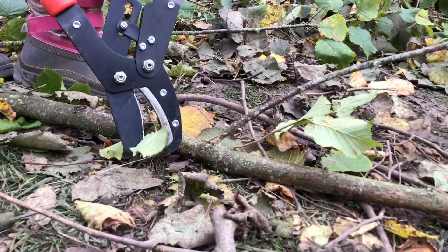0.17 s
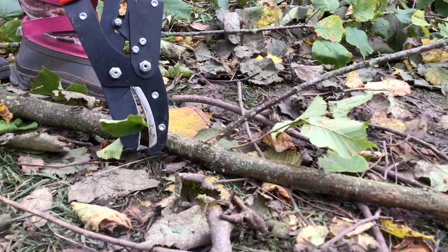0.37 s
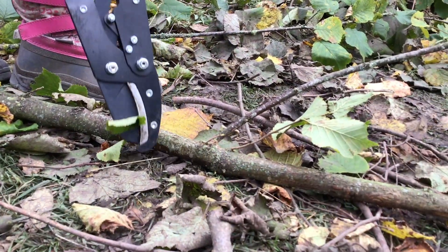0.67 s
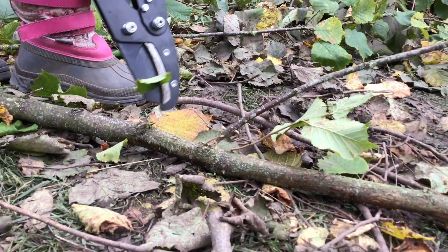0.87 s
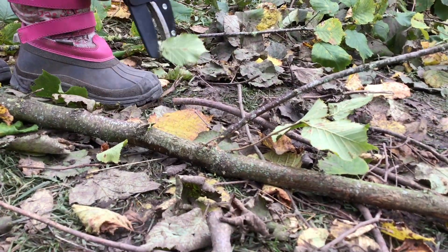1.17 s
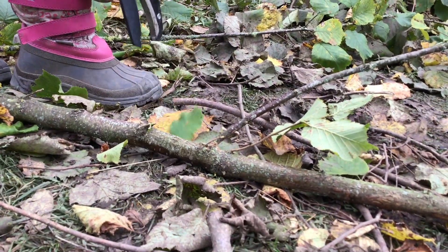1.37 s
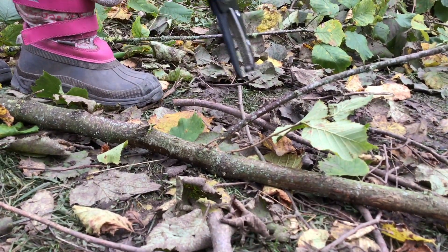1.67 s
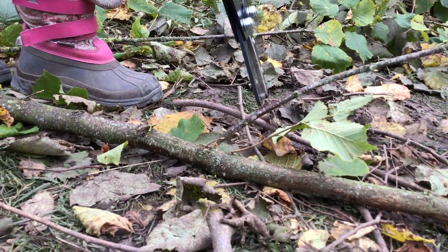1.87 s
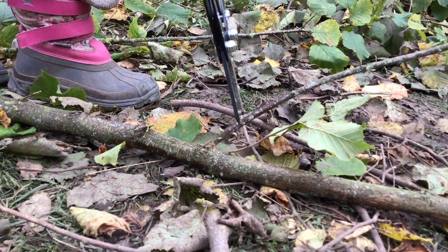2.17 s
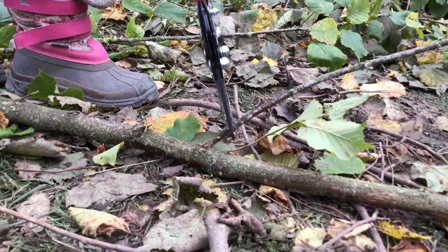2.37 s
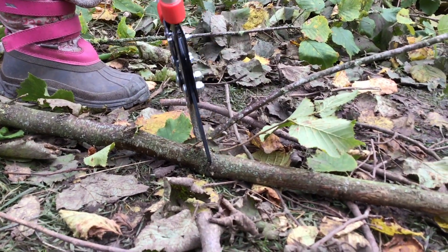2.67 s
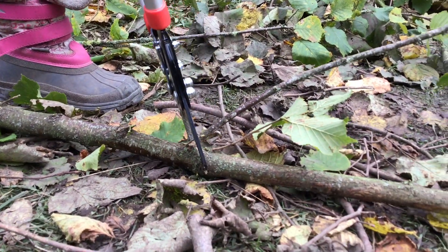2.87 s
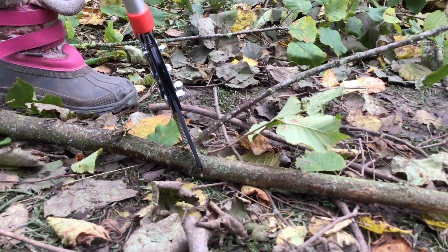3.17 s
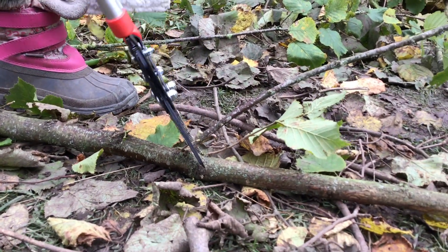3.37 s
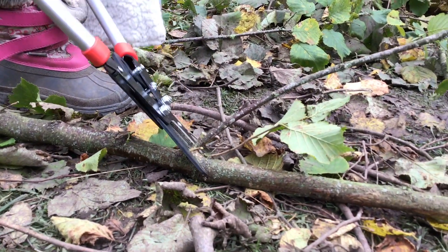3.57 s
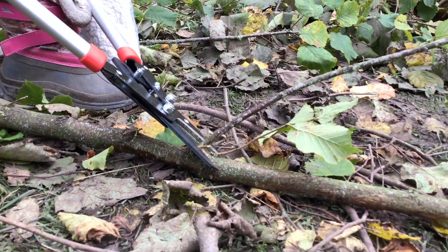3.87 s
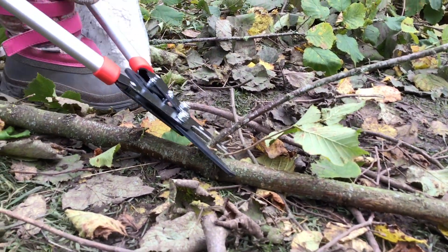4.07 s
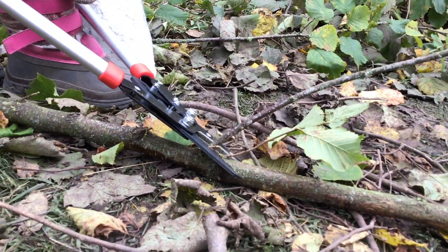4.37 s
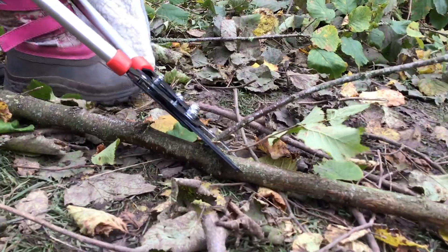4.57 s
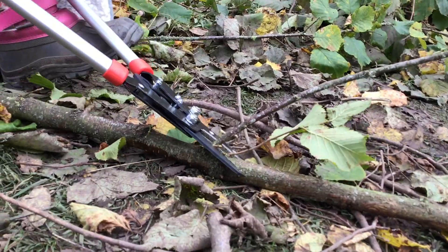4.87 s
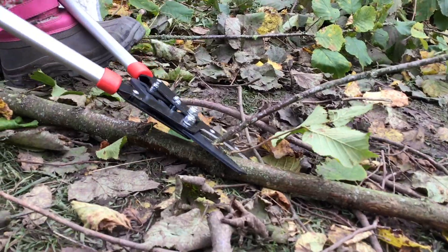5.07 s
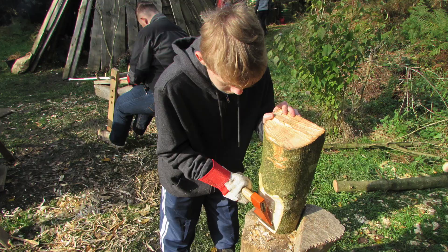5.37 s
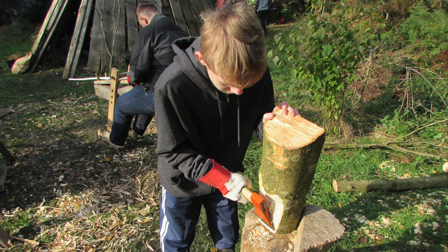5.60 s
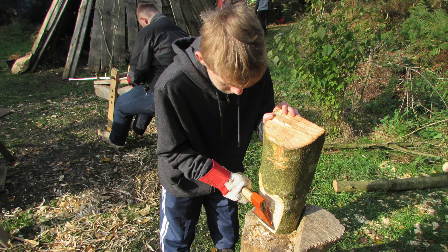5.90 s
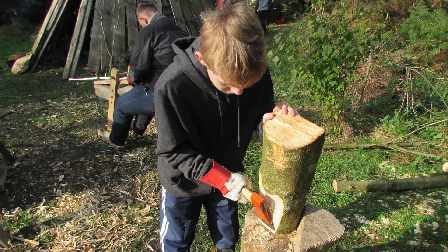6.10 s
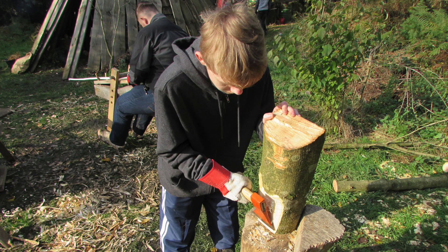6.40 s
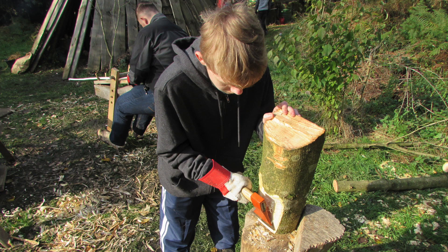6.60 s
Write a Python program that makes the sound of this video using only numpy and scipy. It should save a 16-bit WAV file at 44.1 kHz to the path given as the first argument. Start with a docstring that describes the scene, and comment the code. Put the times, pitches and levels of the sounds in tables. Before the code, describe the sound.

Close to a small microphone outdoors, steel lopper jaws click lightly, then snap shut very loudly near one second, leaving a brief high blade ring and a fainter hollow handle ring. A quieter middle has leaf rustle, scattered clicks, faint metal rubbing and two distant thin bird whistles. A second hard snap comes late, followed by busier clicks and soft knocks. Low wind rumbles throughout.

```python
"""Long-handled loppers work on thin branches on a woodland floor, close to a small microphone.
Light clicks come first; near one second the steel jaws snap shut, and blade and hollow handles ring on.
In the quieter middle a far bird whistles twice. Near 5.4 seconds the jaws snap shut again and more clicks follow.
All along, steel rubs now and then, leaves and twigs rustle, and a light wind pushes on the microphone.
The metal is made of short noise and dying tones, the litter and wind of shaped noise, the bird of gliding tones."""
import sys
import numpy as np
from scipy import signal
from scipy.fft import rfft, irfft, next_fast_len
from scipy.io import wavfile
from scipy.ndimage import map_coordinates

SR = 44100
rng = np.random.default_rng(int(sys.argv[2]) if len(sys.argv) > 2 else 0)


def magnitude_from_level(level_db):
    """Linear magnitude for a level in decibels (20 dB per decade)."""
    exponent = np.asarray(level_db, float) / 20
    return 10 ** exponent


def master_out(mix):
    """Clip the mix to full scale and print it as 16-bit PCM to the path in sys.argv[1]."""
    frames = np.transpose(np.atleast_2d(mix))
    ceiling = np.clip(frames, -1, 1)
    pcm = np.round(ceiling * 32767).astype(np.int16)
    wavfile.write(sys.argv[1], SR, pcm)


N = 297234  # length in samples


def unit(x):
    """Scaled to rms 1."""
    return x / np.sqrt(np.mean(x ** 2) + 1e-20)


def along(points, hz):
    """Reads a curve of (Hz, value) points, joined by straight lines on a log frequency axis."""
    point_hz, value = np.transpose(points)
    return np.interp(np.log(hz + .1), np.log(point_hz + .1), value)


def wobble(rate):
    """A smooth random curve with rate random points a second."""
    return map_coordinates(rng.standard_normal(N // 100), [np.arange(N) * rate / SR])


def coloured(x, spectrum):
    """Filters x by a curve of (Hz, dB) points."""
    m = next_fast_len(len(x) + 8192)
    gain = magnitude_from_level(along(spectrum, np.fft.rfftfreq(m, 1 / SR)))
    return irfft(rfft(x, m) * gain, m)[:len(x)]


def add(track, s, sound):
    """Mixes a sound into the track at s seconds."""
    part = track[round(s * SR):][:len(sound)]
    part += sound[:len(part)]


def ring(modes, t, spread_db, sag=0):
    """Dying tones of slightly random strength; a tight part starts sharp by the share sag and settles."""
    bent = t + sag * .1 * (1 - np.exp(-t / .1))  # the pitch settles with a time constant of 0.1 s
    total = 0
    for hz, db, t60 in modes:
        level_db = db + rng.normal(0, spread_db) - 60 * t / t60
        total = total + magnitude_from_level(level_db) * np.sin(2 * np.pi * hz * bent)
    return total


def clicks():
    """Each contact is a short rattle of noise through the damped jaw tones; a dull one trades treble for lows."""
    # Contacts of the jaws. Each row: start in seconds, energy in dB, dullness in dB (extra lows),
    # ring of the pivot in dB over the energy.
    contacts = [(.054, -39, 1, 7), (.236, -36.5, 0.5, 1), (.314, -39, 9, 14), (.456, -39.5, 9, 12),
                (0.5373, -17, 2.5, 21), (0.5447, -14, 6.5, 16), (.553, -19.5, -2, -3),
                (.865, -28.5, 11, 20.5), (.936, -30.5, 8.5, 4.5), (.943, -26.5, -2.5, -5.5),
                (.969, -25.5, 5, 12), (0.9719, 12.5, -3, 9), (0.9745, 8.5, -2, 7),
                (1.036, -27.5, -0.5, 22.5), (1.168, -50.5, 13, 10.5), (1.185, -49.5, 13, 14.5),
                (1.229, -49.5, 14, 25.5), (1.3357, -26.5, 3.5, 6.5), (1.431, -43.5, 11.5, 11),
                (1.991, -52, 14, 10), (2.471, -26, 8, 7.5), (2.571, -40, 1, 10), (2.629, -33.5, 6, 15.5),
                (2.64, -27.5, 1.5, 3), (2.662, -33.5, 11.5, 9), (2.781, -36, 6, 1), (3.521, -42.5, 10, 13),
                (4.052, -41.5, 12.5, 1), (4.3997, -25, 8, 8), (4.4035, -19.5, 1, 10),
                (4.4348, -28, 16.5, -0.5), (4.436, -29.5, 13, -1.5), (4.444, -35.5, 13.5, 4.5),
                (4.9234, -49, 20, 12), (5.048, -44, 8.5, 8), (5.202, -35, 3, 7.5), (5.387, -8.5, -8, 6.5),
                (5.3882, 11, -3.5, 1), (5.392, 2.5, 2.5, -1.5), (5.409, -17, -4.5, -0.5),
                (5.492, -30.5, -7, 11), (5.51, -28, 0.5, -12.5), (5.528, -32, -4, -13),
                (5.5682, -25.5, 1, 4), (5.7662, -26, 3, 4.5), (5.812, -26, -1, 1), (5.826, -30, -3, 12),
                (5.834, -37, 2, 3), (5.9948, -19.5, 14, 12.5), (6.007, -34.5, 15.5, 5),
                (6.0174, -21, -5, -5), (6.028, -32, 2, 14.5), (6.2733, -27.5, 6, 3), (6.347, -12, 6, 7.5)]
    # Tones of the jaws. Each row: pitch in Hz, level in dB, time to fall by 60 dB in seconds.
    jaw_tones = [(1100, -7.5, 0.025), (1705, -0.5, 0.0096), (2046, -1.5, 0.016), (2632, -0.5, 0.0099),
                 (3377, -2, 0.019), (3650, 7, 0.0065), (4670, -3.5, 0.0053), (5670, -5, 0.0033),
                 (7210, -4.5, 0.0027), (8240, -2.5, 0.0034), (9310, -1.5, 0.0045), (11050, -7, 0.002),
                 (11650, -4.5, .007), (12820, 1, 0.0057), (13670, 2.5, 0.0082), (16600, -2.5, 0.0079)]
    # Low, pivot, middle and top band of a contact. Each row: lower and upper edge in Hz.
    bands = [(1000, 2300), (3000, 4000), (5000, 9500), (10500, 15000)]
    rattle_s, rattle_t60 = .0019, 0.0063  # the force holds, then dies
    edge_db, dull_costs = -7, 0.28  # top band of a light neutral contact; dB it loses per dB of dullness
    hard_from_db, hard_gains = -18, .4  # above this energy the top band gains so many extra dB per dB

    out, t = np.zeros(N), np.arange(SR // 16) / SR
    hz = np.fft.rfftfreq(len(t), 1 / SR)
    for s, energy_db, dull_db, pivot_db in contacts:
        force = rng.standard_normal(len(t)) * magnitude_from_level(-60 * np.maximum(t - rattle_s, 0) / rattle_t60)
        body = ring(jaw_tones, t, spread_db=1.5)
        body[0] = 8  # the bare crack
        hit = signal.fftconvolve(force, body)[:len(t)]

        # Filter the hit so that each band has its wanted strength.
        power = np.abs(rfft(hit)) ** 2
        top_db = edge_db - dull_costs * dull_db + hard_gains * max(energy_db - hard_from_db, 0)
        band_db = energy_db + np.array([dull_db, pivot_db, 0, top_db])
        gain, colour = [], []
        for db, (lo, hi) in zip(band_db, bands):
            gain.append(db - 10 * np.log10(power[(hz > lo) & (hz < hi)].mean()))
            colour += [(lo, gain[-1]), (hi, gain[-1])]
        bass = [(200, gain[0] - 28), (750, gain[0] - 14)]  # small parts radiate no bass
        treble = [(16300, gain[-1] - 2), (16900, gain[-1] - 35)]
        add(out, s, coloured(hit, bass + colour + treble))
    return out


def blade():
    """A few hard contacts leave the thin blade ringing high until it touches wood again."""
    # Tones of the blade. Each row: pitch in Hz, level in dB, time to fall by 60 dB in seconds.
    blade_tones = [(8495, 1.5, 0.07), (12100, -16.5, 0.036), (12500, -12, .035)]
    # Rings of the blade. Each row: start in seconds, level in dB, time it rings freely in seconds.
    blade_rings = [(0.5425, -46.5, 0.019), (0.9735, -11.5, 0.074), (4.4019, -51, .014),
                   (5.3916, -21, 0.011), (6.345, -50, 0.013)]
    out, t = np.zeros(N), np.arange(SR // 8) / SR
    for s, db, free in blade_rings:
        touch = magnitude_from_level(-3000 * np.maximum(t - free, 0))  # the wood damps it by 3000 dB per second
        onset = 1 - np.exp(-t / 0.00051)
        add(out, s, magnitude_from_level(db) * ring(blade_tones, t, spread_db=1.0) * touch * onset)
    return out


def handles():
    """The tubes and the linkage ring until a firmer grip stops them; once a stretched part glides down."""
    # Jolts that set the handles ringing. Each row: start in seconds, tube level in dB, hardness in dB
    # (added from tone to tone), linkage level in dB, time they ring freely in seconds.
    jolts = [(.976, -57, 2, -63, .06), (1.034, -58.5, 0, -80, .11), (5.391, -62, -9, -53, .2),
             (5.49, -70, 14, -60, .2), (6.13, -81, -11, -86, .17), (6.348, -69, 6, -64, .4)]
    # Handle tubes, linkage and stretched part (pitch at rest).
    # Each row: pitch in Hz, level in dB, time to fall by 60 dB in seconds.
    tube_tones = [(547, -3, 1.1), (1096, 2, 1.5), (1643, -1, .6)]
    link_tones = [(720, -12, 0.67), (2330, -10.5, 0.52), (2476.4, -7.5, 0.19), (2750, -12, 0.28),
                  (3230, -7, 0.29), (3390, 0.5, 0.33), (3930, -3.5, 0.28), (4550, -8, 0.33),
                  (5560, -18, .3)]
    spring_tones = [(3340, -53, .7), (3970, -55, .8), (6450, -68, .4)]
    release_s, sharp_share = .975, .06  # the stretched part lets go; share by which it starts sharp
    grip_db_per_s = -300

    out, t = np.zeros(N), np.arange(SR * 3 // 4) / SR
    for s, tube_db, hard_db, links_db, free in jolts:
        struck = []
        for k, (hz, db, t60) in enumerate(tube_tones):
            struck.append((hz, tube_db + db + hard_db * (k - 1), t60))
        tube = ring(struck, t, spread_db=3)
        linkage = magnitude_from_level(links_db) * ring(link_tones, t, spread_db=1.5)
        grip = magnitude_from_level(grip_db_per_s * np.maximum(t - free, 0))
        onset = 1 - np.exp(-t / 0.0027)
        add(out, s, (tube + linkage) * grip * onset)
    spring = ring(spring_tones, t, spread_db=0.5, sag=sharp_share)
    add(out, release_s, spring * magnitude_from_level(grip_db_per_s * np.maximum(t - .3, 0)))
    return out


def rubs():
    """Steel slides on steel: a swell of noise in one resonance of the jaws, which do not close."""
    # Each row: start in seconds, length in seconds, level in dB, resonance in Hz.
    slides = [(.4, .13, -76, 3460), (0.687, 0.051, -68.5, 8340), (2.031, .06, -76, 7580),
              (2.35, .07, -81, 3300), (2.551, 0.13, -65, 3330), (2.592, 0.064, -67, 8260),
              (2.889, .06, -75.5, 3350), (5.41, 0.051, -58, 3530)]
    rub_width = 0.079  # bandwidth as a share of the pitch
    out = np.zeros(N)
    for s, length, db, hz in slides:
        n = round(length * SR)
        resonance = signal.iirpeak(hz, 1 / rub_width, SR)
        noise = unit(signal.lfilter(*resonance, rng.standard_normal(n)))
        add(out, s, magnitude_from_level(db) * np.sqrt(np.hanning(n)) * noise)
    return out


def thuds():
    """Wood on the ground knocks softly and low: a damped tone and its overtone."""
    # Each row: start in seconds, level in dB, pitch in Hz, time to fall by 60 dB in seconds.
    knocks = [(.54, -47, 600, .02), (.866, -56, 620, 0.026), (.972, -36, 420, .015),
              (0.969, -32, 194, 0.019), (4.157, -58, 200, 0.031), (4.735, -61, 431, .12),
              (4.762, -59, 221, .024), (4.922, -45, 245, .018), (5.048, -51.5, 580, 0.017),
              (5.2, -45, 276, 0.024), (5.388, -34.5, 240, .03), (5.39, -33, 450, 0.02034),
              (5.483, -56.5, 258, .074), (5.547, -56, 190, 0.058), (5.753, -49.5, 349, 0.039),
              (5.813, -58, 241, .11), (5.86, -50.5, 322, .023), (5.992, -49, 280, 0.035),
              (6.68, -60, 295, 0.032)]
    out, t = np.zeros(N), np.arange(SR // 6) / SR
    for s, db, hz, t60 in knocks:
        tones = [(hz, 0, t60), (2.1 * hz, -8, .7 * t60)]
        add(out, s, magnitude_from_level(db) * ring(tones, t, spread_db=1.5))
    return out


def trees(x):
    """Ground and trunks scatter a short answer: noise whose treble dies faster, a few milliseconds late."""
    # Each row: frequency in Hz, time to fall by 60 dB in seconds.
    scatter_decay = [(300, 0.22), (3000, 0.12), (12000, 0.044)]
    hz, t, z = signal.stft(rng.standard_normal(SR // 3), SR, nperseg=256)
    decay = magnitude_from_level(-60 * t / along(scatter_decay, hz)[:, None])
    tail = signal.istft(z * decay, SR, nperseg=256)[1]
    late = np.pad(x, (200, 0))  # delay in samples
    return signal.fftconvolve(late, tail / np.linalg.norm(tail))[:N]


def stirring():
    """Gains of leaves, fizz and twigs as tool and boots stir the litter: fast rise, swell or sag, then a fall."""
    # Each row: start in seconds, length in seconds, level in dB, swell in dB over its length,
    # fizz of dry edges in dB over the leaves.
    stirs = [(0.132, 0.13, -70, -8.5, -10), (.26, 0.33, -67, -4, -8.5), (0.678, .06, -72.5, 0.5, -5),
             (0.77, 0.2, -71, -4.5, -11), (0.981, 0.068, -52.5, -2, -3.5), (1.069, 0.256, -67.5, -4.5, -4),
             (1.335, 0.043, -64.5, -2, -8), (2.02, 0.065, -74, 1, -12), (2.356, .05, -75, -3, -8),
             (2.506, 0.15, -71, 10.5, -12), (2.717, 0.088, -74.5, 11, -10.5),
             (2.827, .12, -72.5, 2.5, -11.5), (2.972, .2, -79.5, 0.5, -10), (3.199, 0.18, -74, 1, -12.5),
             (3.453, 0.16, -70.5, 2.5, -7.5), (3.62, 0.34, -72.5, 0, -10.5), (3.961, 0.25, -69, 2.5, -9),
             (4.22, 0.19, -72.5, -1.5, -10), (4.439, 0.039, -59, -4, -10), (4.399, 0.052, -62, 1, -11),
             (4.504, 0.13, -69.5, 3.5, -11.5), (4.658, 0.486, -69.5, -3.5, -12),
             (5.166, 0.18, -66, -2.5, -9.5), (5.388, 0.089, -56, -6, -5), (5.487, 0.19, -62, -0.5, -8),
             (5.686, 0.15, -61.5, 3.5, -10), (5.86, 0.054, -65, -3.5, -11.5), (5.929, 0.061, -67, 14, -14),
             (6.001, 0.069, -52.5, -7, -13.5), (6.091, .09, -68.5, 0, -9.5), (6.234, 0.056, -73, 2, -11),
             (6.529, 0.19, -73.5, 0.5, -11)]
    still_db = np.array((-77, -88.5, -77.5))  # leaves, fizz and twigs at rest
    twigs_db = -8.5  # twigs against the stirred leaves
    rise_db_per_s, fall_db_per_s = 900, 500
    t = np.arange(N) / SR
    power = magnitude_from_level(still_db)[:, None] ** 2 * np.ones(N)
    for s, length, db, swell_db, fizz_db in stirs:
        swell = swell_db * np.clip((t - s) / length, 0, 1)
        rise = rise_db_per_s * np.maximum(s - t, 0)
        fall = fall_db_per_s * np.maximum(t - s - length, 0)
        balance = magnitude_from_level(np.array([[0], [fizz_db], [twigs_db]]))
        power += (magnitude_from_level(db + swell - rise - fall) * balance) ** 2  # powers add
    return np.sqrt(power)


def rustle():
    """Leaves, dry edges and twigs crackle in tiny grains over a soft hiss; all bands share the grains."""
    # Colours of leaves, fizz of dry edges, and twigs. Each row: frequency in Hz, relative level in dB.
    leaf_colour = [(530, -35.5), (900, -8), (995, -4.5), (1280, -0.5), (1550, -3.5), (1680, -1),
                   (1730, -3.5), (1900, -2.5), (2570, -3), (3470, -2.5), (4470, -6), (8430, -8),
                   (10000, -17.5), (13000, -46), (22000, -120)]
    fizz_colour = [(5590, -30.5), (9500, -2.5), (10500, -0.5), (15200, 1.5), (16200, -10.5), (16500, -38.5)]
    twig_colour = [(76, -35.5), (130, -0.5), (509, -4.5), (545, -3.5), (1000, -10.5), (1300, -38.5),
                   (2200, -120)]
    leaves, fizz, twigs = stirring()
    grain_db = np.minimum(4 * rng.exponential(size=N), 12)
    grains = (rng.random(N) < 120 / SR) * magnitude_from_level(grain_db)  # on average 120 grains a second
    clump = signal.lfilter([1], [1, -np.exp(-1 / (.0015 * SR))], grains)  # each dies in about 1.5 ms
    flutter = magnitude_from_level(1 * wobble(14) + 1.2 * wobble(45) + 1.3 * wobble(140))

    def grainy(share):
        """Fluttering noise that gets louder in each grain, by the given share."""
        return unit(flutter * (1 + share * unit(clump)) * rng.standard_normal(N))

    leaf_sound = leaves * unit(coloured(grainy(share=.33), leaf_colour))
    fizz_sound = fizz * unit(coloured(grainy(share=.42), fizz_colour))
    twig_sound = twigs * unit(coloured(grainy(share=.1), twig_colour))
    return leaf_sound + fizz_sound + twig_sound


def bird():
    """Thin falling whistles: gliding tones that swell and fade."""
    # Each row: start in seconds, first pitch in Hz, last pitch in Hz, length in seconds, level in dB.
    whistles = [(1.9, 5760, 5560, .125, -79), (3.86, 5700, 5600, .07, -81)]
    out = np.zeros(N)
    for s, start_hz, end_hz, length, db in whistles:
        u = np.linspace(0, 1, round(length * SR))
        swell = np.sqrt(np.sin(np.pi * u) + 1e-9)
        turns = np.cumsum(start_hz + (end_hz - start_hz) * u) / SR
        add(out, s, magnitude_from_level(db) * swell * np.sin(2 * np.pi * turns))
    return out


def wind():
    """Slow pushes of air on the microphone are very low noise; a low drone follows their strength."""
    # Strength of the wind. Each row: time in seconds, level in dB.
    gusts = [(0, -22), (.6, -27.5), (1.2, -34.5), (1.7, -27), (2.1, -17.5), (2.5, -32.5), (3, -22),
             (3.5, -30), (4.2, -37), (4.9, -39), (5.3, -26.5), (6, -27.5), (6.4, -41.5), (6.62, -32.5),
             (6.74, -54)]
    # Colours of the slow pressure and the drone. Each row: frequency in Hz, relative level in dB.
    push_colour = [(.5, -14), (2, 0), (5, 0), (9, -10), (14, -26), (20, -37), (30, -52), (36, -60),
                   (44, -120)]
    drone_colour = [(20, -29.5), (36, -6), (45, -2), (90, 6), (130, -10.5), (200, -17.5), (300, -61)]
    drone_db, drone_follows = -76, 0.76  # level at mean wind; dB per dB of wind
    gust_s, gust_db = np.transpose(gusts)
    wind_db = np.interp(np.arange(N) / SR, gust_s, gust_db)
    push = unit(coloured(rng.standard_normal(N), push_colour))
    drone = unit(coloured(rng.standard_normal(N), drone_colour) * magnitude_from_level(2.5 * wobble(19)))
    drone_gain = magnitude_from_level(drone_db + drone_follows * (wind_db - wind_db.mean()))
    return magnitude_from_level(wind_db) * push + drone_gain * drone


def scene():
    """Everything reaches one microphone."""
    tool = clicks() + blade() + thuds()
    answer = magnitude_from_level(-24.5) * trees(tool)
    mix = tool + answer + handles() + rubs() + rustle() + bird() + wind()
    return mix[None]


def low_pass(x):
    """Removes everything above the highest recorded frequency."""
    return signal.sosfilt(signal.butter(12, 16930, fs=SR, output="sos"), x)


def record(dry):
    """The input saturates on the hardest snap: peaks bend smoothly towards a ceiling of 0.9."""
    held = dry / (1 + np.abs(dry / .9) ** 4) ** (1 / 4)
    return low_pass(held)


dry = scene()
out = record(dry)
master_out(out)
```